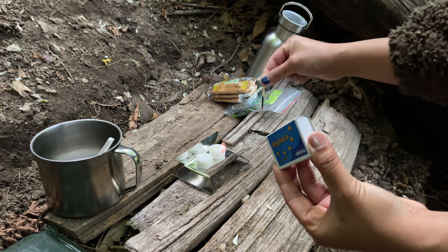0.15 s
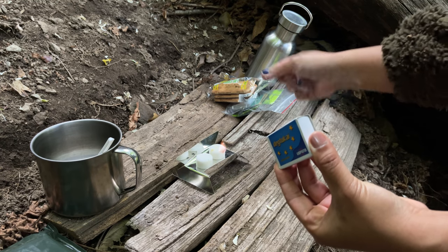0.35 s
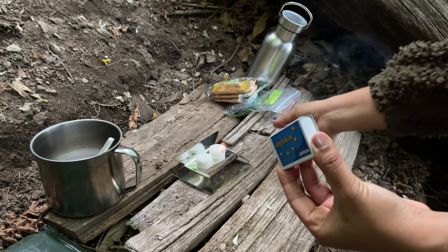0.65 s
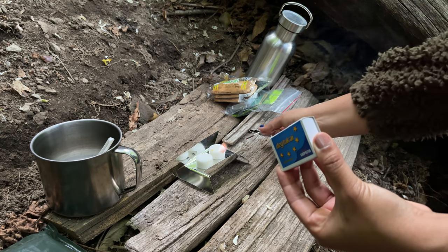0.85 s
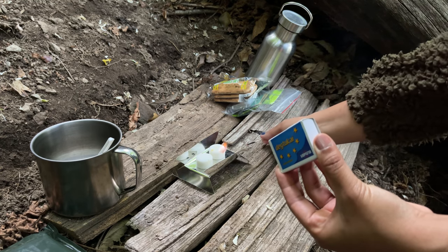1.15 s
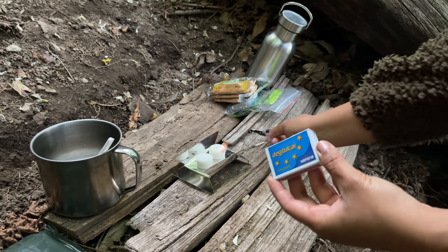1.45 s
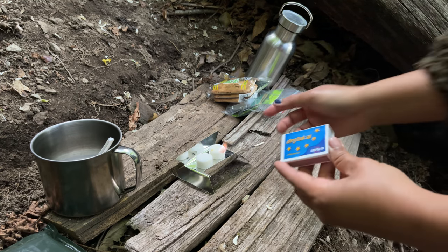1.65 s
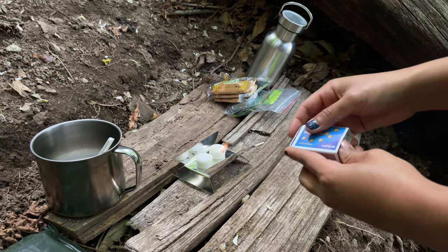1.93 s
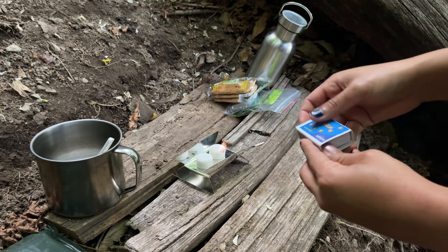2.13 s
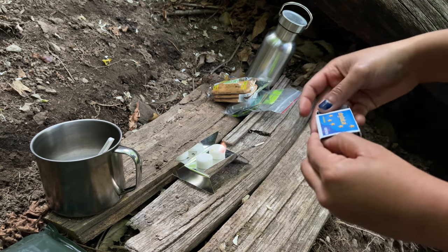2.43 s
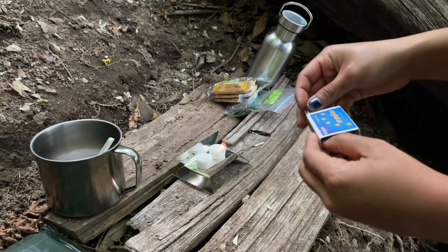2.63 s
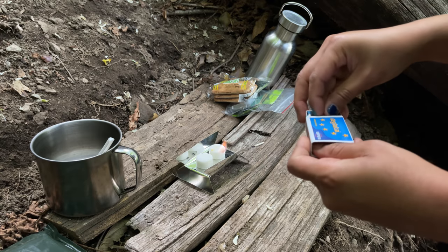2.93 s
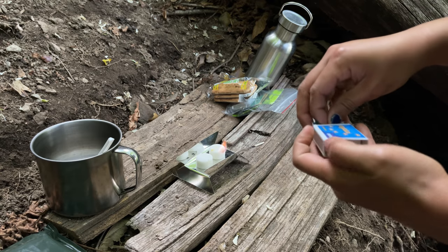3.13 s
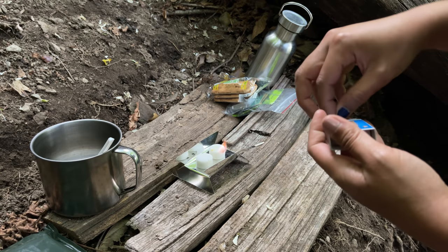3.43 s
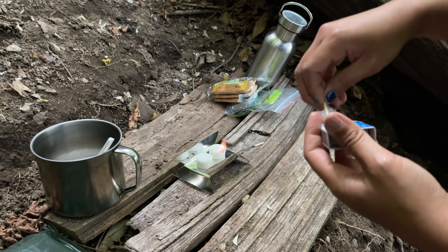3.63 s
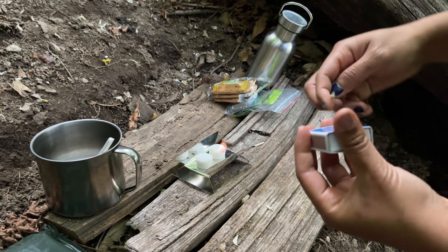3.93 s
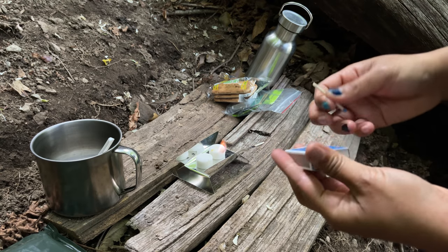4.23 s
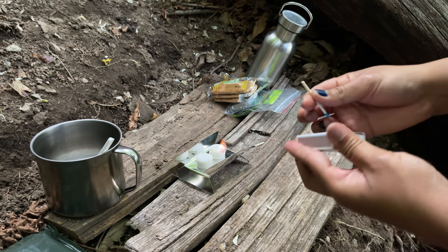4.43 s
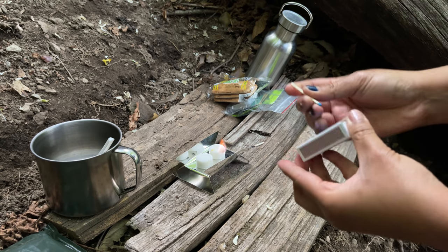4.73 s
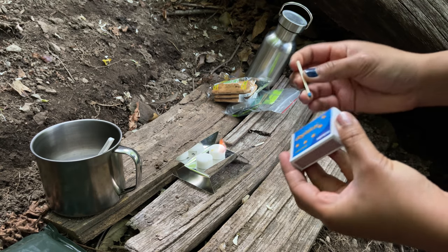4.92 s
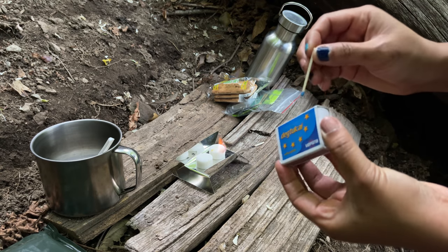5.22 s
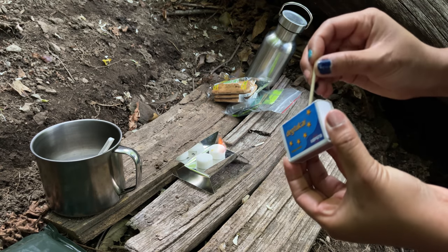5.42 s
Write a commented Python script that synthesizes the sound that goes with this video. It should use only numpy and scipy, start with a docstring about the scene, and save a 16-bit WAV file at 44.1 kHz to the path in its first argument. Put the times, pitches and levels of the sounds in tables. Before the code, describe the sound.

Quiet woodland in stereo, with faint airy hush and echoing far-off bird whistles all round. A near bird gives a quick doubled chirp, later a single one. Right by the microphone a matchbox is turned with papery skin rustle and tiny wooden clicks, slid open with scratchy rattling, searched, shut with a brisk scrape, then tipped so the matches knock. No match is struck.

```python
"""A cardboard matchbox is turned in the hands, its tray slid open, a match picked out and the tray pushed shut.
Random slips of skin, card and wood ring the box's modes; loose matches knock as impulses in a short noise burst.
A small near bird chirps twice, the first time doubled: swept tones, partly scattered by the trunks.
Distant birds whistle, gliding and fluttering, mostly through echoes, over a faint wide hush of shaped noise."""
import sys
import numpy as np
from scipy import signal
from scipy.fft import rfft, irfft, next_fast_len
from scipy.io import wavfile

SR = 44100
rng = np.random.default_rng(int(sys.argv[2]) if len(sys.argv) > 2 else 0)


def generate_wav(sig):
    """Save sig (samples, or channels by samples) to the path in sys.argv[1] as 16-bit PCM at SR."""
    pcm = np.round(np.clip(np.atleast_2d(sig).T, -1, 1) * 32767).astype(np.int16)
    wavfile.write(sys.argv[1], SR, pcm)


N = 245637  # samples


def undb(db):
    """Decibels to gain."""
    return 10 ** (np.asarray(db) / 20)


def level(x, db):
    """Scale to an rms level."""
    return x * undb(db) / np.sqrt(np.mean(x ** 2) + 1e-20)


def add(out, start_s, x):
    """Mix a sound in at a time."""
    i = max(int(start_s * SR), 0)
    out[i:i + len(x)] += x[:len(out) - i]


def band(x, hz, width_hz):
    """One resonance, gain 1 at its centre."""
    b, a = signal.iirpeak(min(hz, .45 * SR), hz / width_hz, fs=SR)
    return signal.lfilter(b, a, x)


def frequencies(size):
    """Bin frequencies in Hz of a real FFT, at least 1."""
    return np.maximum(np.arange(size // 2 + 1) * SR / size, 1)


def colour(x, points):
    """Shape a spectrum by (Hz, dB) points, straight lines over log frequency."""
    hz, db = np.transpose(points)
    size = next_fast_len(len(x))
    gain = undb(np.interp(np.log(frequencies(size)), np.log(hz), db))
    return irfft(rfft(x, size) * gain, size)[:len(x)]


def walk(size, rate_hz):
    """Smooth random curve: normal values at rate_hz, joined by lines."""
    at = np.arange(size) * rate_hz / SR
    return np.interp(at, np.arange(4096), rng.standard_normal(4096))


def swell(size, edge):
    """Flat top with rounded ends; edge is the share spent rising and falling."""
    return signal.windows.tukey(size, np.clip(edge, 0, 1))


# Width of diffuse sound. Each row: frequency in Hz, side minus mid in dB.
SIDE_WIDTH = [(60, -2), (200, -4), (700, -6), (1300, -9), (2500, -14), (4200, -6), (8000, -2)]


def surround(mid, side):
    """Left and right of a diffuse sound: mid plus and minus the shaped side."""
    return mid + np.array([[1], [-1]]) * colour(side, SIDE_WIDTH)


# Spectrum of the hush. Each row: frequency in Hz, relative density in dB per Hz.
HUSH_SPECTRUM = [(20, 6.5), (45, -7), (80, -4), (330, -8.5), (560, -11.5), (1200, -12), (2200, -6),
                 (3500, -3), (4200, -4.5), (5100, -9.5), (7900, -10.5), (8300, -17), (9600, -18),
                 (15500, -37)]
HUSH_DB = -59.5  # rms, before drift
# Steady narrow hiss. Each row: centre in Hz, width in Hz of each of two passes, rms level in dB.
HISS_BANDS = [(5756, 170, -71.5), (6810, 200, -68.5), (7400, 130, -74), (7782, 180, -69.5), (396, 57, -81)]


def woodland(drift_db=0.5, drift_hz=3.45):
    """Wide hush of drifting shaped noise, plus narrow noise bands."""
    def layer():
        hush = level(colour(rng.standard_normal(N), HUSH_SPECTRUM), HUSH_DB)
        out = hush * undb(drift_db * walk(N, drift_hz))
        for hz, width_hz, db in HISS_BANDS:
            once = band(rng.standard_normal(N), hz, width_hz)
            out += level(band(once, hz, width_hz), db)
        return out
    return surround(layer(), layer())


def trees(x, t60_s, gap_s):
    """Trunks and leaves scatter a sound back as a fading cloud of echoes, built up over gap_s."""
    t = np.arange(SR) / SR
    fade = undb(-60 * t / t60_s) * (1 - np.exp(-t / gap_s))
    mid, side = rng.standard_normal((2, SR)) * fade
    echoes = surround(mid, side) / np.sqrt(np.sum(fade ** 2))
    return signal.fftconvolve(x[None], echoes, axes=1)[:, :N]


TWITTERS_PER_S, TWITTER_LENGTH_S = 2.9, 0.077
TWITTER_DB = -63.5  # rms, before the direct and echo gains
TWITTER_HZ, TWITTER_OCTAVES = 3340, .5  # mid pitch, spread to either side


def twitters(glide_octaves=0.153, flutter=0.0296):
    """Faint short whistles at random times and pitches, as rows of DISTANT_WHISTLES."""
    when, pitch, glide = rng.random((int(TWITTERS_PER_S * N / SR), 3)).T
    first_hz = TWITTER_HZ * 2 ** (TWITTER_OCTAVES * (2 * pitch - 1))
    last_hz = first_hz * 2 ** (glide_octaves * (2 * glide - 1))
    return [(start_s, TWITTER_LENGTH_S, first, last, TWITTER_DB, flutter)
            for start_s, first, last in zip(when * N / SR, first_hz, last_hz)]


# Clearest whistles of distant birds. Each row: start in seconds, length in seconds, first pitch in Hz,
# last pitch in Hz, rms level in dB before the direct and echo gains, pitch flutter as a share.
DISTANT_WHISTLES = [(.199, 0.062, 2850, 2620, -61, 0.039), (0.239, 0.088, 2950, 3010, -59, .008),
                    (.465, .046, 3550, 3820, -56.5, .046), (0.564, .022, 5800, 4620, -59.5, .014),
                    (0.59, 0.058, 4655, 4390, -55, .014), (0.838, 0.11, 3215, 3080, -58, 0.013),
                    (0.99, 0.033, 2630, 2770, -54.5, 0.014), (1.199, 0.11, 3150, 3224, -57, 0.0079),
                    (1.32, .115, 2393, 2044, -54.5, .015), (1.345, 0.055, 2700, 2810, -57, 0.017),
                    (1.424, 0.092, 2170, 2350, -63, 0.029), (1.555, 0.061, 2250, 1773, -59.5, 0.057),
                    (1.776, 0.12, 2667, 2504, -54, 0.013), (1.975, 0.188, 2620, 2704, -58, 0.021),
                    (2.385, .065, 2340, 2280, -57.5, .022), (2.459, 0.07, 2295, 1980, -54, .005),
                    (2.64, 0.041, 2560, 2570, -52.5, 0.0081), (4.206, 0.26, 2780, 2980, -58.5, 0.076),
                    (4.736, 0.13, 2740, 2905, -58, 0.074)]


def far_birds(direct_db=-5, echo_db=-2, edge=0.22, flutter_hz=348):
    """Gliding, fluttering sine whistles, heard largely through their echoes."""
    out = np.zeros(N)
    for start_s, length_s, first_hz, last_hz, db, flutter in DISTANT_WHISTLES + twitters():
        size = int(length_s * SR)
        hz = np.geomspace(first_hz, last_hz, size) * (1 + flutter * walk(size, flutter_hz))
        tone = np.sin(2 * np.pi * np.cumsum(hz) / SR)
        add(out, start_s, level(tone * swell(size, edge), db))
    return undb(direct_db) * out + undb(echo_db) * trees(out, t60_s=0.68, gap_s=0.0017)


# Shape of one chirp. Each row: time from its start in seconds, pitch in Hz before the call's ratio,
# level in dB relative to the call.
CHIRP_SHAPE = [(0, 3540, -35), (.008, 4280, -10), (.02, 5100, -6), (.033, 5670, -6), (.05, 6040, 1.5),
               (0.066, 6363, 3), (0.079, 6300, -30), (0.089, 5300, -34), (0.104, 4540, -32)]
# Calls. Each row: start in seconds, level in dB, pitch ratio, echo in dB at the top pitch of the shape.
CHIRP_CALLS = [(1.0, -41, 1, 2.5), (1.053, -50, 0.9, 0.5), (3.19, -38, 0.98, -4)]


def near_bird(overtone_db=-29, waver=0.011, waver_hz=726, spread_db_per_octave=9):
    """Almost pure tone sweeps up and hooks over; lower notes spread wider and so echo more."""
    at_s, pitch_hz, shape_db = np.transpose(CHIRP_SHAPE)
    t = np.arange(int(at_s[-1] * SR)) / SR
    direct, scattered = np.zeros(N), np.zeros(N)
    for start_s, db, ratio, echo_db in CHIRP_CALLS:
        hz = ratio * np.interp(t, at_s, pitch_hz) * (1 + waver * walk(len(t), waver_hz))
        phase = 2 * np.pi * np.cumsum(hz) / SR
        tone = np.sin(phase) + undb(overtone_db) * np.sin(2 * phase)
        call = tone * undb(db + np.interp(t, at_s, shape_db))
        spread_db = spread_db_per_octave * np.log2(pitch_hz.max() / hz)
        add(direct, start_s, call)
        add(scattered, start_s, call * undb(echo_db + spread_db))
    return direct + trees(scattered, t60_s=0.47, gap_s=0.00073)


# Modes of the box with its tray. Each row: centre in Hz, width in Hz, level in dB shut, level in dB open.
BOX_MODES = [(946, 81, -3, -22), (1696, 475, 0.5, -9), (2307, 360, 2, 5), (2880, 550, 3, 0.5),
             (4190, 1060, 1.5, 5.5), (6200, 570, -4.5, -4), (6810, 530, -3.5, -2), (8300, 1100, -9, -22),
             (10730, 330, -29, -8)]
OPEN_S, OPEN_LENGTH_S = 2.843, 0.14  # tray starts to open; time taken
SHUT_S, SHUT_LENGTH_S = 3.872, 0.021  # tray starts to shut; time taken


def box(force, at_s, ring_hz, treble_db, ring_db, ring_width_hz, direct_db=-17,
        lowest_hz=1280, soft_hz=12500, treble_hz=4600):
    """Box radiates a contact force; mode weights follow the tray at at_s, the contact favours one ring."""
    size = 2 * next_fast_len(len(force))
    f = frequencies(size)
    opened = (at_s - OPEN_S) / OPEN_LENGTH_S
    still_open = 1 - (at_s - SHUT_S) / SHUT_LENGTH_S
    opening = np.clip(min(opened, still_open), 0, 1)

    def mode(hz, width_hz):
        return 1 / (1 + ((f / hz - hz / f) * hz / width_hz) ** 2)

    power = undb(direct_db) ** 2
    for hz, width_hz, shut_db, open_db in BOX_MODES:
        power = power + undb(shut_db + opening * (open_db - shut_db)) ** 2 * mode(hz, width_hz)
    gain = np.sqrt(power) * (1 + undb(ring_db) * mode(ring_hz, ring_width_hz))
    # so small a body gives no bass; soft card dulls the very top
    gain = gain / np.sqrt((1 + (lowest_hz / f) ** 10) * (1 + (f / soft_hz) ** 6))
    gain = gain * undb(treble_db / (1 + (treble_hz / f) ** 4))
    # minimum phase: card rings only after it is touched
    cepstrum = irfft(np.log(gain + 1e-4))
    cepstrum[1:size // 2] *= 2
    cepstrum[size // 2 + 1:] = 0
    return irfft(rfft(force, size) * np.exp(rfft(cepstrum)))[:len(force)]


ONSET_S = .002  # soft noise rise before the hit
CHATTER_S = 0.021  # chatter's 60 dB decay after the hit


def knock(at_s, peak_db, ring_hz, treble_db, chatter_db=-13, ring_db=6):
    """Match hits the card wall with a slightly softened onset, then chatters against its neighbours."""
    t = np.arange(SR // 16) / SR - ONSET_S
    rise = np.clip(1 + t / ONSET_S, 0, 1)
    decay = undb(-60 * np.maximum(t, 0) / CHATTER_S)
    force = undb(chatter_db) * rng.standard_normal(len(t)) * rise * decay
    force[int(ONSET_S * SR)] += 1  # the hit
    sound = box(force, at_s, ring_hz, treble_db, ring_db, ring_width_hz=330)
    return undb(peak_db) * sound / np.abs(sound).max()


# Matches knocking in the box. Each row: hit in seconds, peak level in dB, ring in Hz, treble in dB.
MATCH_KNOCKS = [(1.258, -33, 3320, 4.5), (1.274, -34.5, 3270, -14), (1.507, -35, 3880, -19),
                (1.712, -36, 3030, -8), (1.7416, -31, 2860, -5), (1.7864, -31.5, 3260, -1),
                (2.0952, -35, 3430, 11), (2.457, -30, 4500, -2), (2.8756, -24, 3020, -4),
                (2.918, -25, 2300, 0), (2.9435, -24, 2400, -8), (2.992, -26.5, 2360, -3),
                (3.055, -24, 2360, -8), (3.072, -29.5, 3600, 6), (3.1031, -34, 2360, -12),
                (3.2825, -32.5, 2430, -7), (3.339, -30.5, 2550, -8), (3.4494, -29.5, 2260, 5),
                (3.465, -31, 2320, -4), (3.5087, -32.5, 4100, -9), (3.9422, -32, 3050, 18),
                (4.4879, -27, 3900, 8), (4.518, -31, 3930, 5), (4.992, -31, 4140, -2),
                (5.291, -38.5, 3940, -7), (5.3162, -36, 4000, -9.5), (5.392, -35.5, 2770, -14),
                (5.4181, -38, 2100, -16), (5.4257, -31.5, 1650, -11), (5.4426, -19.5, 2070, -10.5),
                (5.45, -26.5, 3040, 5), (5.467, -30.5, 1540, -2)]


def knocks():
    """Clear knocks of matches as the box is tipped and searched."""
    out = np.zeros(N)
    for hit_s, peak_db, ring_hz, treble_db in MATCH_KNOCKS:
        add(out, hit_s - ONSET_S, knock(hit_s, peak_db, ring_hz, treble_db))
    return out


def slips(size, per_s, scatter_db):
    """Tiny random slips of either sign and uneven size."""
    chance, force = rng.random(size), rng.standard_normal((2, size))
    sizes = undb(scatter_db * np.minimum(force[1], 2))
    return (chance < per_s / SR) * np.sign(force[0]) * sizes


HANDLING_FROM_S, HANDLING_TO_S, HANDLING_EASE_S = 1.45, 5.55, 0.35  # eases in and out within the span
GRIP_DB = -58.5  # rms, before the easing, unevenness and relaxing


def grip(uneven_db=2.46, uneven_hz=35, relax_db_per_s=0.84):
    """Skin shifts on the card: a faint uneven rustle through the shut box's modes, slowly relaxing."""
    t = np.arange(N) / SR
    inside_s = np.minimum(t - HANDLING_FROM_S, HANDLING_TO_S - t)
    busy = np.clip(inside_s / HANDLING_EASE_S, 0, 1)
    force = slips(N, per_s=3000, scatter_db=1.5)
    sound = box(force, 0, ring_hz=1830, treble_db=0, ring_db=-15, ring_width_hz=550)
    midway_s = (HANDLING_FROM_S + HANDLING_TO_S) / 2
    drift_db = uneven_db * walk(N, uneven_hz) - relax_db_per_s * (t - midway_s)
    return level(sound, GRIP_DB) * busy * undb(drift_db)


JOSTLES_PER_S, JOSTLE_PEAK_DB = 5.5, -44.5  # peak is the middle of its scatter
JOSTLE_LOW_HZ, JOSTLE_HIGH_HZ = 2150, 4300  # range of rings


def jostles(scatter_db=2, treble_db=1):
    """Loose matches click faintly at random while the box is handled."""
    out, span_s = np.zeros(N), HANDLING_TO_S - HANDLING_FROM_S
    for when, place, force in rng.random((int(JOSTLES_PER_S * span_s), 3)):
        start_s = HANDLING_FROM_S + when * span_s
        ring_hz = JOSTLE_LOW_HZ + place * (JOSTLE_HIGH_HZ - JOSTLE_LOW_HZ)
        peak_db = JOSTLE_PEAK_DB + scatter_db * (2 * force - 1)
        add(out, start_s, knock(start_s, peak_db, ring_hz, treble_db))
    return out


def friction(length_s, slips_per_s, scatter_db, judder_db=0, judder_hz=0):
    """Shower of slips; any judder is the surfaces catching and letting go."""
    size = int(np.clip(length_s, .005, .5) * SR)
    return slips(SR // 2, slips_per_s, scatter_db)[:size] * undb(judder_db * walk(size, judder_hz))


def roam(force, roam_db=4.0, roam_hz=70):
    """Contact moves over the card and feeds now one mode more, now another."""
    out = force.copy()
    for hz, width_hz, _, _ in BOX_MODES:
        out += band(force, hz, width_hz) * (undb(roam_db * walk(len(force), roam_hz)) - 1)
    return out


def stroke(force, edge, start_s, db, ring_hz, treble_db, ring_db):
    """One stroke of friction swells, rings the box and ends; db is rms over the force's length."""
    padded = np.pad(force * swell(len(force), edge), (0, SR // 100))  # room to ring out
    sound = box(roam(padded), start_s, ring_hz, treble_db, ring_db, ring_width_hz=310)
    return level(sound, db) * np.sqrt(len(sound) / len(force))


# Fingers rubbing the box. Each row: start in seconds, length in seconds, rms level in dB,
# treble in dB relative to bright_db.
FINGER_RUBS = [(1.936, .135, -51, -0.5), (2.129, .092, -52.5, -0.5), (2.21, 0.14, -56, 5),
               (2.306, 0.098, -46.5, -1), (2.435, 0.073, -54, -5), (2.565, 0.071, -52.5, -7.5),
               (2.74, .062, -50, 2.5), (2.947, 0.27, -51, -5.5), (3.386, .18, -52.5, -7),
               (3.587, 0.053, -52.5, -7), (4.104, 0.054, -56, 4), (4.193, 0.076, -51.5, -1.5),
               (4.562, 0.075, -54.5, -1.5), (4.711, 0.07, -51.5, -1), (4.916, 0.074, -54, -6),
               (5.154, 0.032, -58.5, -7)]


def fingers(ring_hz=1700, ring_db=-8, bright_db=4.5, edge=0.46):
    """Skin rubs softly over the card in sparse, even slips."""
    out = np.zeros(N)
    for start_s, length_s, db, treble_db in FINGER_RUBS:
        force = friction(length_s, slips_per_s=2400, scatter_db=1.5)
        add(out, start_s, stroke(force, edge, start_s, db, ring_hz, treble_db + bright_db, ring_db))
    return out


# Card and match wood scraping along the tray. Each row: start in seconds, length in seconds,
# rms level in dB, ring in Hz, treble in dB relative to bright_db.
TRAY_SLIDES = [(2.86, 0.053, -44, 3180, -3), (2.893, 0.053, -39.5, 3440, -6),
               (2.979, .02, -49.5, 3120, -23), (3.043, 0.035, -46, 2530, -2),
               (3.372, 0.02, -45.5, 4380, -15), (3.411, 0.035, -41, 2240, -1),
               (4.445, 0.037, -43, 4120, -6.5), (4.738, 0.015, -45.5, 3870, 2.5),
               (4.949, 0.031, -46, 3630, -1)]


def tray(ring_db=8, bright_db=7.0, edge=0.12):
    """Card and wood scrape harder and catch more than skin."""
    out = np.zeros(N)
    for start_s, length_s, db, ring_hz, treble_db in TRAY_SLIDES:
        force = friction(length_s, slips_per_s=5000, scatter_db=5, judder_db=2, judder_hz=470)
        add(out, start_s, stroke(force, edge, start_s, db, ring_hz, treble_db + bright_db, ring_db))
    return out


# One firm push shuts the tray. Each row: time in seconds, level of the scrape in dB.
PUSH_LEVELS = [(3.849, -54), (3.854, -41), (3.865, -38.5), (3.874, -31), (3.912, -25), (3.919, -46),
               (3.936, -48)]
PUSH_FIRST_HZ, PUSH_LAST_HZ = 2020, 4250  # favoured ring, open and shut


def push(first_treble_db=5.5, last_treble_db=10.0, first_ring_db=11, last_ring_db=8):
    """Tray rasps home; the ring of the open box gives way to that of the shut one."""
    out = np.zeros(N)
    at_s, db = np.transpose(PUSH_LEVELS)
    force = roam(friction(at_s[-1] - at_s[0], slips_per_s=20000, scatter_db=1.5, judder_db=4.0, judder_hz=438))
    t = at_s[0] + np.arange(len(force)) / SR
    travel = np.clip((t - SHUT_S) / SHUT_LENGTH_S, 0, 1)
    opened = box(force, at_s[0], PUSH_FIRST_HZ, first_treble_db, first_ring_db, ring_width_hz=120)
    shut = box(force, at_s[-1], PUSH_LAST_HZ, last_treble_db, last_ring_db, ring_width_hz=300,
               direct_db=-10, soft_hz=9300)
    blend = np.sqrt(1 - travel) * level(opened, 0) + travel * level(shut, 0)
    add(out, at_s[0], blend * undb(np.interp(t, at_s, db)))
    return out


def scene():
    """Box close, dry and straight ahead; echoes and hush all round."""
    matchbox = fingers() + tray() + push() + grip() + knocks() + jostles()
    return matchbox + near_bird() + far_birds() + woodland()


# Microphone's treble response. Each row: frequency in Hz, gain in dB.
MICROPHONE_RESPONSE = [(7500, 0), (9000, 1.5), (11400, .5), (12600, -3), (15500, -6)]
TOP_HZ = 15750  # recorder's cutoff


def record(dry):
    """Microphone shapes the treble, falling at the top; the recorder cuts all above TOP_HZ."""
    sound = np.array([colour(channel, MICROPHONE_RESPONSE) for channel in dry])
    lowpass = signal.ellip(10, .2, 70, TOP_HZ, fs=SR, output="sos")
    return signal.sosfilt(lowpass, sound)


dry = scene()
out = record(dry)
generate_wav(out)
```